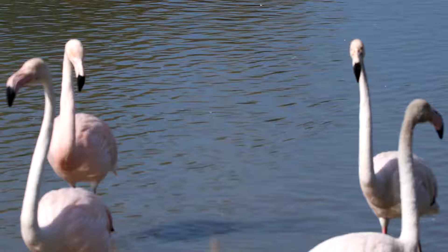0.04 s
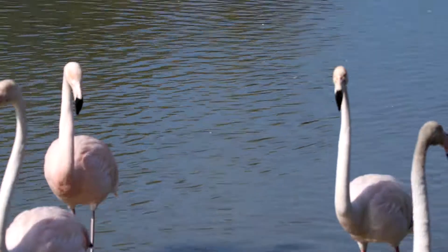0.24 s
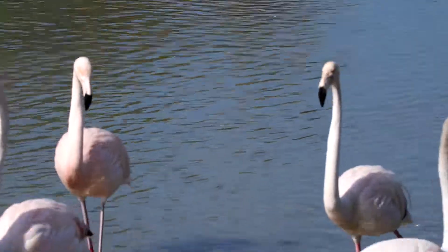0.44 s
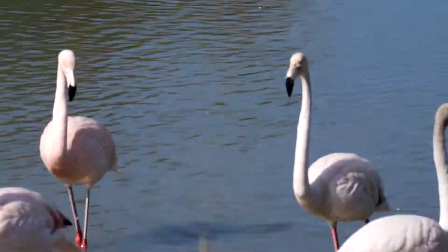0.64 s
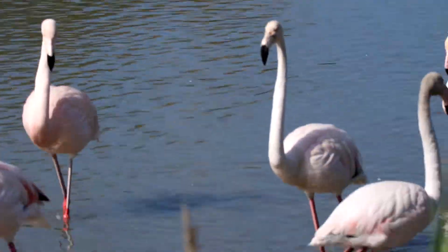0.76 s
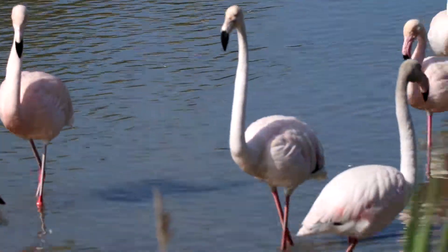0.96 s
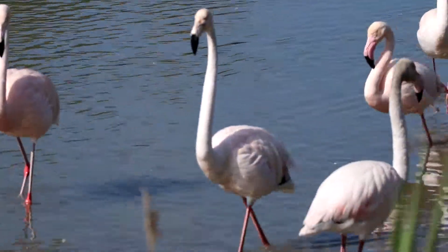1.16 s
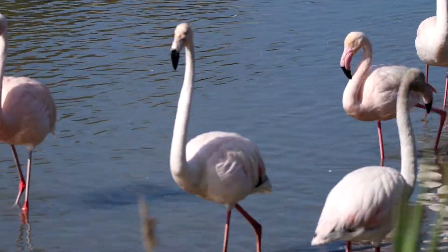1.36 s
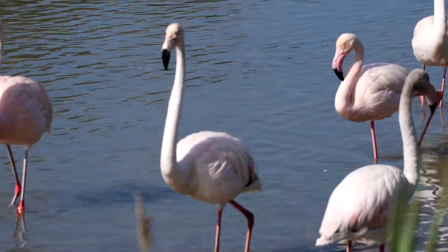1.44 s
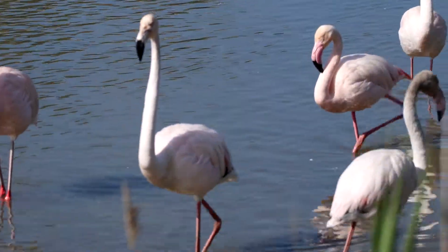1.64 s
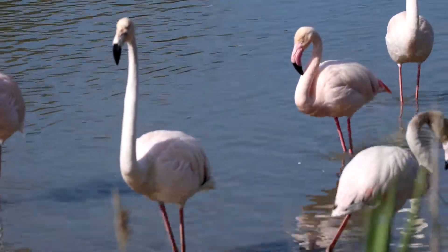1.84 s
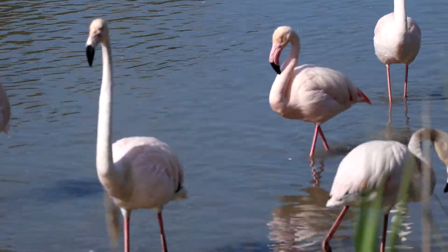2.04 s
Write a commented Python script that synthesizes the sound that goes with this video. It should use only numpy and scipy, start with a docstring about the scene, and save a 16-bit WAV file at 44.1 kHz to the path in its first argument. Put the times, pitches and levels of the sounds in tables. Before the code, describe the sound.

A flock of flamingos gabbles in short, raspy grunts and nasal honks on a breezy lagoon. A hollow clack sounds close to the microphone at the start. Faint drips and small bird whistles follow, and two louder calls come late.

```python
"""Light wind and a gabbling flamingo flock come first, and at once something hollow clacks close by.
Across the shallow lagoon the flamingos honk and grunt, raspy pulses ringing their long throats;
two louder calls come late. Small birds pipe far off, water drips and splashes around wading legs,
and the banks answer briefly. Two closely spaced microphones hear it."""
import sys
import numpy as np
from scipy import signal
from scipy.fft import rfft, irfft, next_fast_len
from scipy.io import wavfile
from scipy.ndimage import map_coordinates

SR = 44100
rng = np.random.default_rng(int(sys.argv[2]) if len(sys.argv) > 2 else 0)


def unload_wav(signal):
    """Save mono or channel-first audio to the path in sys.argv[1] as 16-bit WAV at rate SR, clipped to [-1, 1]."""
    wavfile.write(
        sys.argv[1],
        SR,
        np.round(np.clip(np.atleast_2d(signal).T, -1, 1) * 32767).astype(np.int16),
    )


N = 92610


def amp(db):
    return 10 ** (np.asarray(db) / 20)


def unit_rms(x):
    return x / np.sqrt(np.mean(x ** 2) + 1e-20)


def curve_at(points, hz):
    """Interpolate (Hz, value) points on a log frequency axis."""
    knots_hz, values = np.transpose(points)
    return np.interp(np.log(hz + 1), np.log(knots_hz + 1), values)


def clock(length_s):
    return np.arange(int(length_s * SR)) / SR


def wobble(t, knots_per_s):
    """Smooth random curve."""
    knots = rng.standard_normal(int(3 * knots_per_s) + 4)
    return map_coordinates(knots, [t * knots_per_s], mode="mirror")


def filtered(x, response):
    """Apply a complex response, given as a function of Hz."""
    n = x.shape[-1]
    padded = next_fast_len(n + 2048)
    return irfft(rfft(x, padded) * response(np.fft.rfftfreq(padded, 1 / SR)), padded)[..., :n]


def resonance(f, hz, width_hz):
    return 1j * f * width_hz / (hz * hz - f * f + 1j * f * width_hz)


def hiss(spectrum, t):
    """Coloured noise of rms 1."""
    return unit_rms(filtered(rng.standard_normal(len(t)), lambda f: amp(curve_at(spectrum, f))))


def arch(t, length_s):
    """Rounded swell and fade."""
    return np.sqrt(np.abs(np.sin(np.pi * np.clip(t / length_s, 0, 1))))


def decay(t, t60_s):
    return amp(-60 * t / t60_s)


def add(out, start_s, x):
    part = out[:, max(0, round(start_s * SR)):][:, :x.shape[-1]]
    part += x[..., :part.shape[1]]


# Each row: frequency in Hz, loss at the far microphone in dB per ms of lag.
SHADOW_DB_PER_MS = [(300, 16), (900, -2.5), (1500, 26.5), (2500, 5), (4000, 34), (16000, -1)]

def place(x, lag_ms, pan_db=0, shadow=0):
    """Mono to stereo: lag_ms delays the left, pan_db favours the left, shadow dims the far side."""
    side = np.array([[0.5], [-0.5]])

    def response(f):
        balance_db = pan_db - shadow * lag_ms * curve_at(SHADOW_DB_PER_MS, f)
        return amp(side * balance_db) * np.exp(-2j * np.pi * f * side * lag_ms / 1000)
    return filtered(x, response)


# Each row: frequency in Hz, left-right correlation of the air noise.
AIR_CORRELATION = [(60, 0.894), (130, 0.816), (290, 0.54), (640, 0.34), (1400, -0.64), (3100, -0.1),
                   (7000, 0.041)]

def open_air(spectrum):
    """Stereo noise: alike in the bass, opposed near 1400 Hz, unrelated in the treble."""
    def response(f):
        angle = np.arccos(np.clip(curve_at(AIR_CORRELATION, f), -1, 1)) / 2
        return amp(curve_at(spectrum, f)) * [np.cos(angle), np.sin(angle)]
    mid, side = filtered(rng.standard_normal((2, N)), response)
    return unit_rms(np.array([mid + side, mid - side]))


# Each row: frequency in Hz, relative level in dB.
WASH_SPECTRUM = [(15, -31.5), (25, -35), (74, -3.5), (185, -15), (463, -10), (695, -7), (840, -1.5),
                 (1260, -7), (2610, -11.5), (5730, -20.5), (6920, -23.5), (14000, -32.5), (16000, -39)]
WIND_SPECTRUM = [(20, -10), (45, -3.5), (70, -6), (130, -6), (250, -13), (600, -19), (2000, -80)]

def breeze(wash_db=-45, wind_db=-56.5, gust_db=2):
    """Ripples and reeds wash over a low rumble of wind."""
    t = np.arange(N) / SR
    wash = amp(wash_db + 1.13 * wobble(t, 8)) * open_air(WASH_SPECTRUM)
    rumble = amp(wind_db + gust_db * wobble(t, 8.83)) * open_air(WIND_SPECTRUM)
    return wash + rumble


# Each row: resonance in Hz, width in Hz, gain in dB.
UPPER_THROAT_MODES = [(1534, 87, -7.5), (1980, 480, -9), (2643, 820, -10.5)]
# Each row: frequency in Hz, gain in dB.
VOICE_COLOUR = [(100, -15), (400, -11), (620, 3), (2800, -2.5), (4000, 2), (8000, -24), (16000, 1)]

def throat(f, throat_hz, bright_db, q=7):
    """Response of the long throat: a main resonance and upper ones of alternating sign."""
    upper = sum((-1) ** (i + 1) * amp(db) * resonance(f, hz, width_hz)
                for i, (hz, width_hz, db) in enumerate(UPPER_THROAT_MODES))
    main = resonance(f, throat_hz, throat_hz / q)
    return amp(curve_at(VOICE_COLOUR, f)) * (main + amp(bright_db) * upper)


def grunt(length_s, pulse_hz, throat_hz, bright_db, swell_db=0):
    """A short train of raspy pulses, smeared by early reflections, rings the throat."""
    jitter_s, scatter_db = 0.00012, 0.24
    rasp_decay_s, rasp_db = 0.0031, -3
    smear_decay_s, smear_db = 0.0022, -2.5
    t = clock(length_s + 0.025)
    n, count = len(t), int(np.ceil(length_s * pulse_hz))
    onsets_s = np.abs(np.arange(count) / pulse_hz + rng.normal(0, jitter_s, count))
    strengths = amp(swell_db * onsets_s / length_s + rng.normal(0, scatter_db, count))
    pulses = np.bincount((onsets_s * SR).astype(int), strengths, n)[:n]
    rasp_envelope = signal.lfilter([1], [1, -np.exp(-1 / (rasp_decay_s * SR))], pulses)
    rasp = rasp_envelope * rng.standard_normal(n)
    reflections = rng.standard_normal(n) * np.exp(-t / smear_decay_s)
    smear = signal.fftconvolve(pulses, reflections)[:n]
    source = unit_rms(pulses) + amp(smear_db) * unit_rms(smear) + amp(rasp_db) * unit_rms(rasp)
    voice = filtered(source, lambda f: throat(f, throat_hz, bright_db))
    return unit_rms(voice) * np.sqrt(n / (length_s * SR))


# Each row: time in seconds, flock level in dB.
FLOCK_LEVELS = [(.2, -42), (.4, -37), (.62, -48.5), (1.0, -56.5), (1.3, -49), (1.5, -54), (1.75, -37),
                (1.9, -51), (2.1, -49.5)]
FLOCK_LAG_MS = 0.28

def flock(count=64):
    """Farther flamingos gabble in overlapping grunts."""
    out = np.zeros((2, N))
    for i, (timing, length, rate, pitch, bright, side) in enumerate(rng.standard_normal((count, 6))):
        call = grunt(length_s=0.104 * np.exp(0.2065 * length), pulse_hz=115 * np.exp(0.2 * rate),
                     throat_hz=872 * np.exp(0.17 * pitch), bright_db=1 + 4 * bright)
        start_s = i / count * N / SR + 0.01 * timing
        add(out, start_s, place(call, FLOCK_LAG_MS + 0.1 * side, shadow=0.96))
    level_db = np.interp(np.arange(N) / SR, *np.transpose(FLOCK_LEVELS))
    return unit_rms(out) * amp(level_db)


# Each row: start in seconds, ring gain in dB, crack level in dB.
CLACK_CONTACTS = [(.2105, -40, -34), (.2135, -21, -27), (.2265, -19, -19), (.2277, -14, -23),
                  (.2303, -8, -20), (.2352, -18.5, -22.5), (.2385, -22, -28), (.2402, -13.5, -51),
                  (.2455, -20, -33), (.2495, -18.5, -44)]
# Each row: frequency in Hz, level in dB, T60 in seconds, pan in dB.
HOLLOW_MODES = [(515.4, -15.5, 0.056, 0), (625, -11.5, 0.037, -3), (970, -15, .025, -1.5),
                (1210, -10.5, 0.019, 4.5), (1527, -3, 0.017, -3), (1799, -1, 0.021, 5.5),
                (1943, -1.5, 0.022, 0), (2120, -7.5, 0.035, -1), (3790, -10, 0.008, 1)]
# Each row: frequency in Hz, relative level in dB.
CRACK_SPECTRUM = [(150, -19), (350, -19), (520, 13), (2500, 2.5), (5000, 3.5), (8000, -8), (16000, -13.5)]

def clack(lag_ms=0.46, attack_s=0.0013):
    """A hollow thing rattles through quick contacts; each cracks and rings it."""
    out, t = np.zeros((2, N)), clock(0.14)
    attack = 1 - np.exp(-t / attack_s)
    for start_s, ring_db, crack_db in CLACK_CONTACTS:
        ring = np.zeros((2, len(t)))
        for hz, db, t60_s, pan_db in HOLLOW_MODES:
            mode = amp(db + rng.normal(0, 1)) * decay(t, t60_s) * np.sin(2 * np.pi * hz * t)
            ring += place(mode, lag_ms, pan_db)
        noise = np.array([hiss(CRACK_SPECTRUM, t), hiss(CRACK_SPECTRUM, t)])
        crack = place(noise * decay(t, t60_s=0.023), lag_ms, pan_db=-0.5)
        add(out, start_s, amp(ring_db) * ring * attack + amp(crack_db) * crack)
    return out


# Each row: start in seconds, length in seconds, level in dB, swell in dB, pulse rate in Hz,
# throat resonance in Hz, brightness in dB, left lag in ms.
NEAR_GRUNTS = [(0.268, 0.066, -48, -1, 112, 780, 4, 0.23), (0.354, .108, -45.5, 4.5, 92, 788, 9, 0.201),
               (0.502, 0.026, -45, -7, 120, 814, 1, 0.22), (.535, 0.087, -49, -2, 108.3, 940, -2.5, 0.26),
               (0.681, 0.05, -44, -2, 100, 752, -0.5, 0.2), (0.776, .03, -47, -6.5, 102, 765, -1, 0.25),
               (.815, 0.072, -47, -1.5, 99, 943, -1.5, 0.27), (0.946, 0.033, -51, -3, 110, 704, -4, 0.27),
               (1.02, 0.09, -51, -4, 106.6, 920, -8, 0.22), (1.12, 0.076, -44.5, -1.5, 112, 778, -3, 0.259),
               (1.225, 0.0622, -46, 3, 93, 1023, -0.5, 0.26), (1.279, 0.051, -47, 2, 109, 780, -9, 0.3),
               (1.385, 0.042, -48.5, 1, 115, 773, -5.5, 0.27), (1.595, .028, -44.5, 3, 98, 815, 4.5, 0.12),
               (1.625, .043, -39.5, -3, 111, 857, 4, 0.13), (1.697, 0.024, -51, 11, 105, 920, 14, .2),
               (1.728, 0.067, -36.5, 1, 105, 937, 0, 0.058),
               (1.803, 0.038, -36.5, -6, 112, 874, 2.5, 0.073), (1.974, 0.066, -45, -7, 89, 760, -9, 0.34),
               (2.066, 0.031, -44, 0, 99.9, 926, 5, -0.19)]

def near_flamingos():
    """Nearer grunts stand out of the flock."""
    out = np.zeros((2, N))
    for start_s, length_s, db, swell_db, pulse_hz, throat_hz, bright_db, lag_ms in NEAR_GRUNTS:
        call = grunt(length_s, pulse_hz, throat_hz, bright_db, swell_db)
        add(out, start_s, amp(db) * place(call, lag_ms, shadow=1))
    return out


# Each row: start in seconds, length in seconds, level in dB, start and end pitch in Hz, resonance in Hz.
NASAL_HONKS = [(0.274, .075, -43.5, 350.9, 360, 1763), (0.344, .1, -45, 335, 292, 1310),
               (.68, 0.058, -49.5, 384.4, 365, 1520), (1.384, 0.04, -43.5, 373, 359, 1430)]

def honks(width_hz=140, roughness=0.017):
    """Higher nasal calls: gliding overtones under one resonance."""
    out = np.zeros((2, N))
    harmonics = np.arange(2, 10)[:, None]
    for start_s, length_s, db, start_hz, end_hz, nasal_hz in NASAL_HONKS:
        t = clock(length_s)
        glide_hz = start_hz + (end_hz - start_hz) * (t / length_s) ** 2
        phase = 2 * np.pi * np.cumsum(glide_hz * (1 + roughness * wobble(t, 215))) / SR
        weights = np.abs(resonance(harmonics * start_hz, nasal_hz, width_hz))
        tone = unit_rms((weights * np.sin(harmonics * phase)).sum(0))
        add(out, start_s, amp(db) * place(tone * arch(t, length_s), FLOCK_LAG_MS, shadow=1))
    return out


# Each row: start in seconds, length in seconds, level in dB, start, middle and end pitch in Hz.
WHISTLES = [(.29, 0.039, -49.5, 3500, 3590, 3850), (.33, 0.032, -47, 3660, 3482, 3700),
            (.285, 0.022, -54.5, 5000, 5150, 5190), (0.332, 0.03, -52, 5240, 5030, 5170),
            (0.718, 0.023, -59, 4120, 3940, 3800), (1.346, 0.018, -56, 3880, 3570, 3400),
            (1.392, 0.028, -51, 3410, 3630, 3950), (1.4, 0.077, -60, 4900, 5130, 5300),
            (1.804, 0.0924, -42.5, 3611, 3540, 3620), (1.971, 0.027, -53, 4670, 4880, 5110),
            (2.012, 0.019, -56.5, 5638, 5430, 5260)]

def small_birds(waver=0.0109):
    """Thin, gliding whistles on the left."""
    out = np.zeros((2, N))
    for start_s, length_s, db, *contour_hz in WHISTLES:
        t = clock(length_s)
        glide_hz = np.polyval(np.polyfit([0, 0.5, 1], contour_hz, 2), t / length_s)
        phase = 2 * np.pi * np.cumsum(glide_hz * (1 + waver * wobble(t, 274))) / SR
        whistle = np.sin(phase) * arch(t, length_s) ** 2
        add(out, start_s, amp(db) * place(whistle, lag_ms=0, pan_db=17))
    return out


# Each row: frequency in Hz, relative level in dB.
SPRAY_SPECTRUM = [(300, -29), (1200, -10), (2300, 5.5), (4500, 4), (9000, -7.5), (16000, -12.5)]

def drip(ring_hz, pan_db, ring_db=8.5, q=6.2):
    """A tick of spray with a short, broad ring."""
    t = clock(0.04)
    tick = hiss(SPRAY_SPECTRUM, t) * decay(t, t60_s=0.02)
    drop = filtered(tick, lambda f: 1 + amp(ring_db) * resonance(f, ring_hz, ring_hz / q))
    return place(drop, lag_ms=-0.11, pan_db=pan_db)


# Each row: start in seconds, relative level in dB, ring in Hz, pan in dB.
LEG_DRIPS = [(0.3624, -32, 2580, 12), (0.574, -42, 3620, 15), (.7064, -34, 9300, 8), (0.75, -38, 4090, 7),
             (.7933, -36.5, 7600, 10), (.9037, -36, 2220, -1), (0.919, -41, 3100, 12),
             (0.9481, -32, 3790, 14.5), (1.024, -38, 3600, 13), (1.0352, -40.5, 3760, 14),
             (1.1971, -44, 7400, 14), (1.2856, -34.5, 7500, 7), (1.318, -37.5, 7500, 7),
             (1.458, -27, 7250, 4.5), (1.4739, -25.5, 4200, 8.5), (1.4883, -30.5, 3040, 3),
             (1.5789, -43, 8750, 15), (1.6364, -44, 9500, 13), (1.6658, -40, 8200, 10),
             (1.9538, -30.5, 2200, 5)]
# Each row: start in seconds, length in seconds, level in dB, pan in dB.
LEG_SPLASHES = [(.5, 0.036, -39, 1), (.9, 0.0554, -52, -9), (1.452, 0.0313, -55, 8),
                (2.072, 0.011, -66, -6)]
# Each row: frequency in Hz, relative level in dB.
SPLASH_SPECTRUM = [(250, -17), (500, -1), (2200, -2.5), (3000, -6), (5500, -5.5), (9000, -12.5),
                   (16000, -25)]

def wading(drip_gain_db=-7, trickle_drops=70):
    """Wading legs shed drops, splash and keep up a faint trickle."""
    out = np.zeros((2, N))
    for start_s, db, ring_hz, pan_db in LEG_DRIPS:
        add(out, start_s, amp(db + drip_gain_db) * drip(ring_hz, pan_db))
    for start_s, length_s, db, pan_db in LEG_SPLASHES:
        t = clock(length_s)
        spray = unit_rms(hiss(SPLASH_SPECTRUM, t) * amp(4 * wobble(t, 379)))
        add(out, start_s, amp(db) * place(spray * arch(t, length_s), lag_ms=-0.05, pan_db=pan_db))
    for when, size, pitch, side in rng.random((trickle_drops, 4)):
        drop = drip(ring_hz=3000 + 7000 * pitch, pan_db=14 * side - 4)
        add(out, when * N / SR, amp(-56 + 10 * size) * drop)
    return out


def banks(x):
    """The banks return a short, diffuse echo."""
    t = clock(0.4)
    tail = rng.standard_normal((2, len(t))) * decay(t, t60_s=0.3)
    return signal.fftconvolve(x, tail / np.linalg.norm(tail[0]), axes=1)[:, :N]


def scene():
    """Birds, clack and water with their echo, over the breeze."""
    birds = flock() + near_flamingos() + honks() + small_birds()
    close = clack() + wading()
    echo = banks(amp(-8.5) * birds + amp(-14) * close)
    return breeze() + birds + close + echo


def record(dry, start_s=0.168, top_hz=16000):
    """Silence before start_s; nothing above top_hz."""
    gate = np.arange(N) / SR > start_s
    return filtered(dry * gate, lambda f: f < top_hz)


dry = scene()
out = record(dry)
unload_wav(out)
```